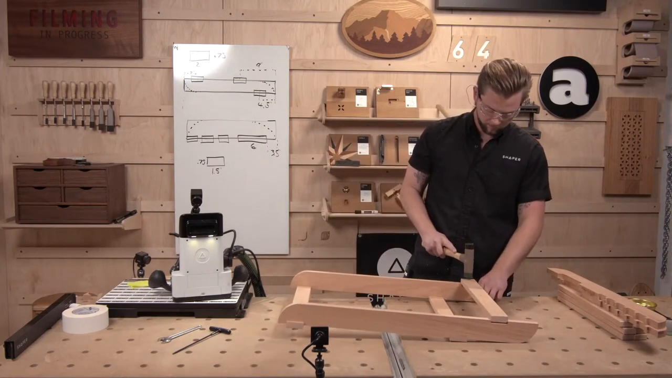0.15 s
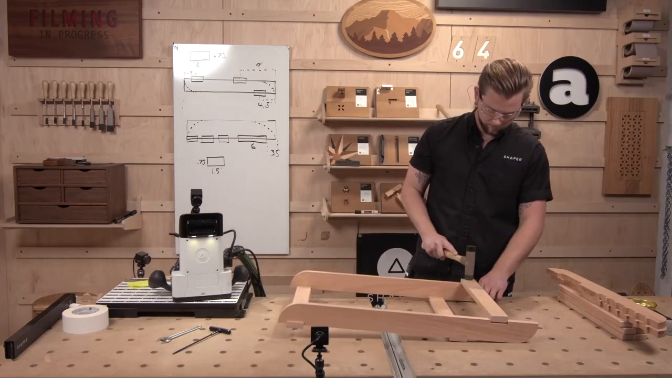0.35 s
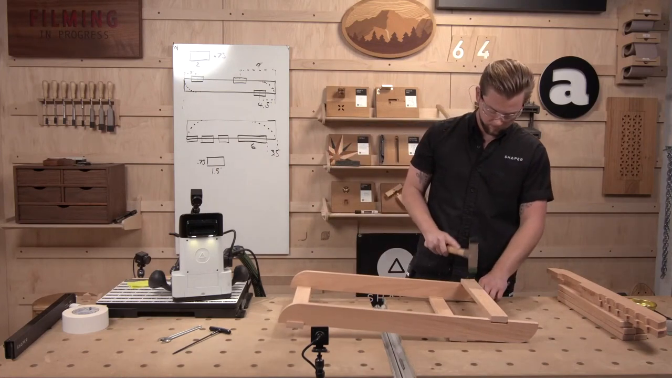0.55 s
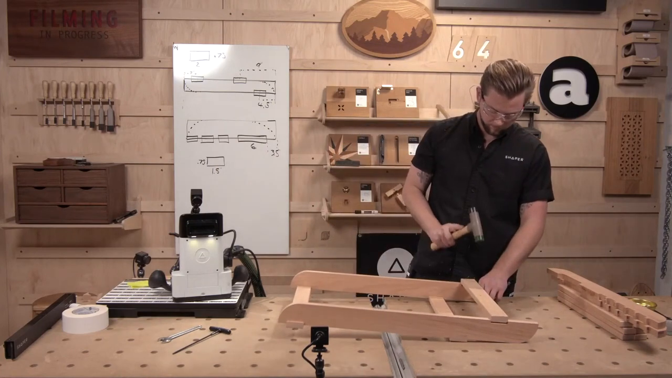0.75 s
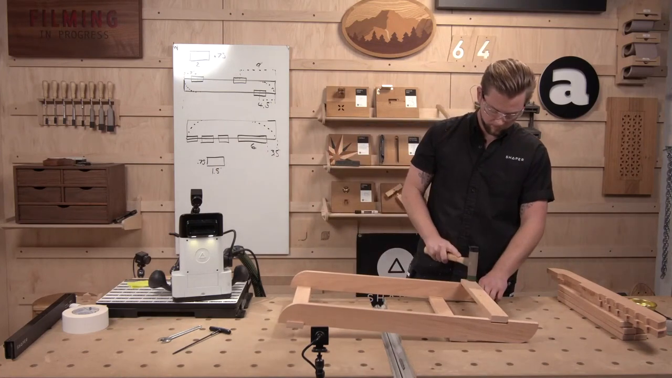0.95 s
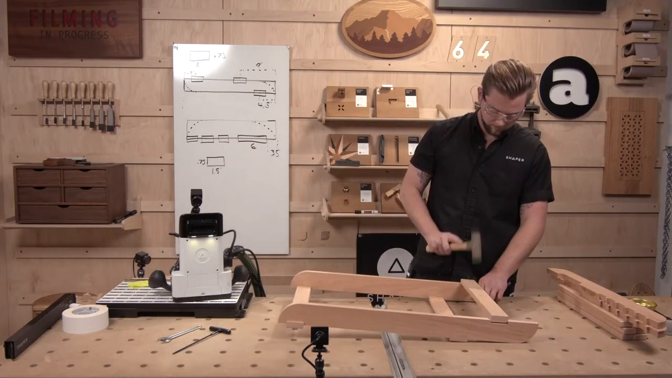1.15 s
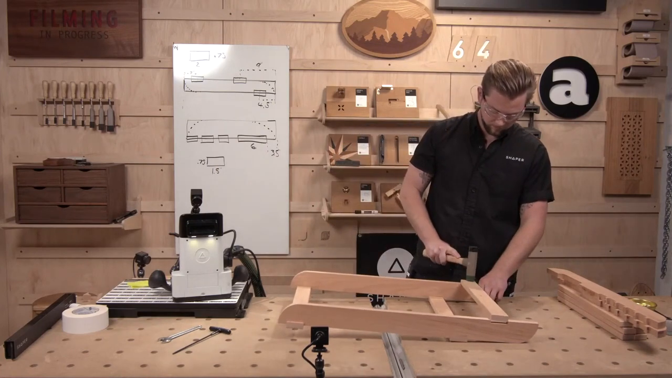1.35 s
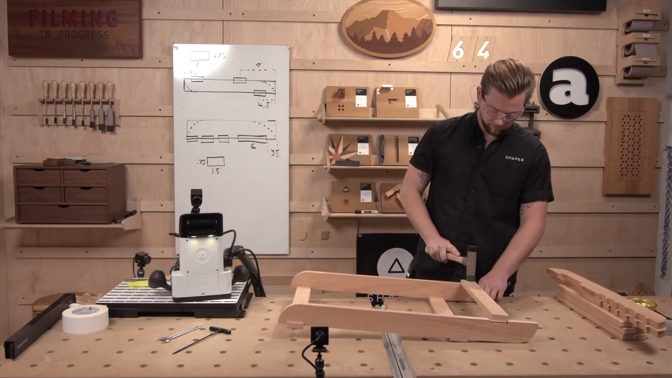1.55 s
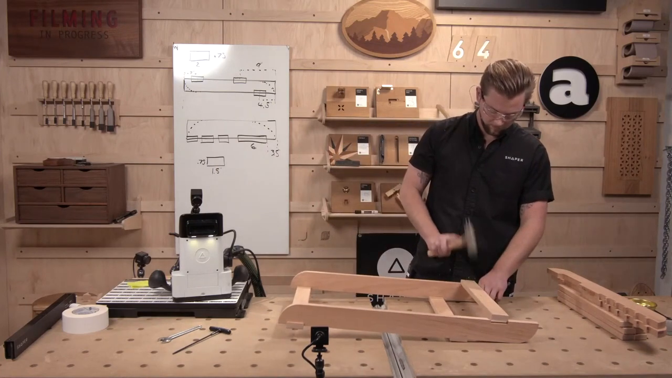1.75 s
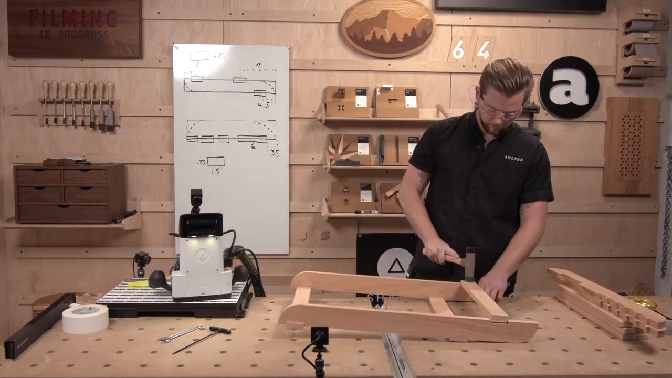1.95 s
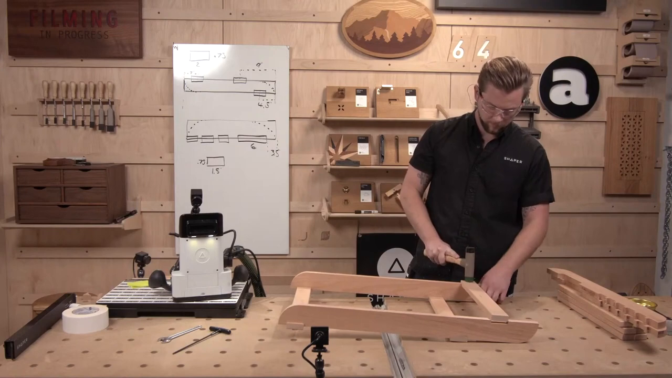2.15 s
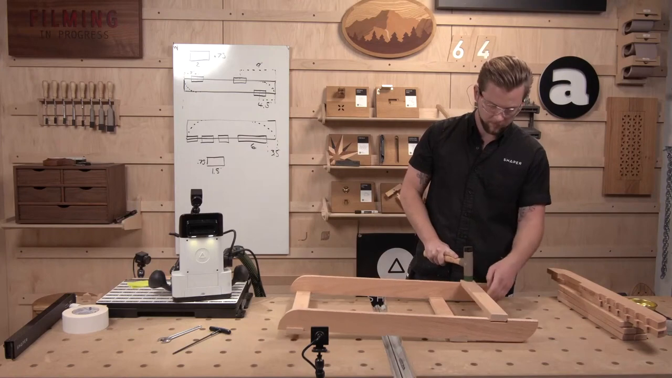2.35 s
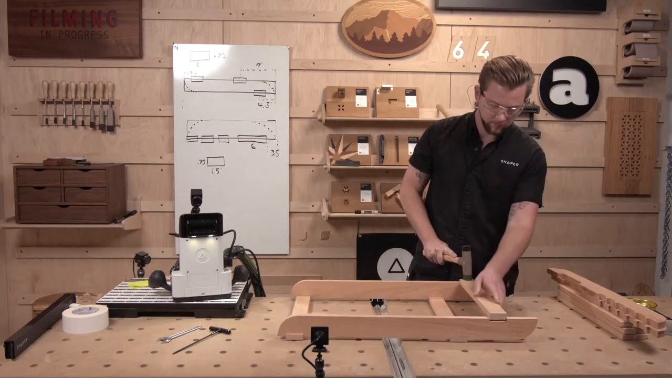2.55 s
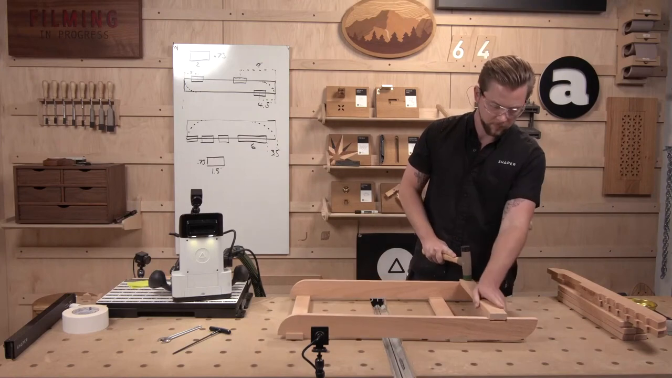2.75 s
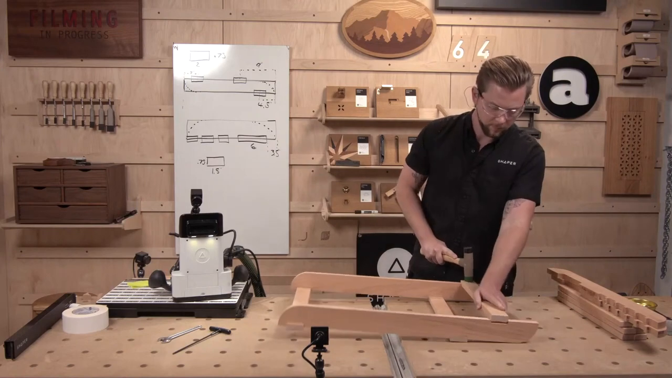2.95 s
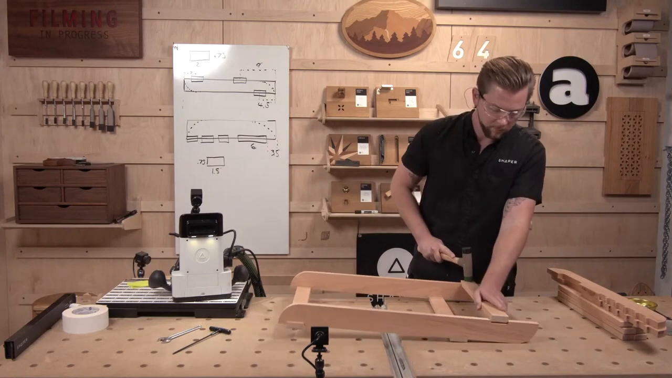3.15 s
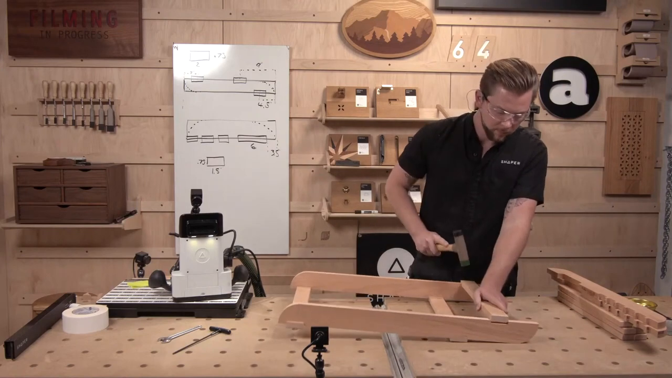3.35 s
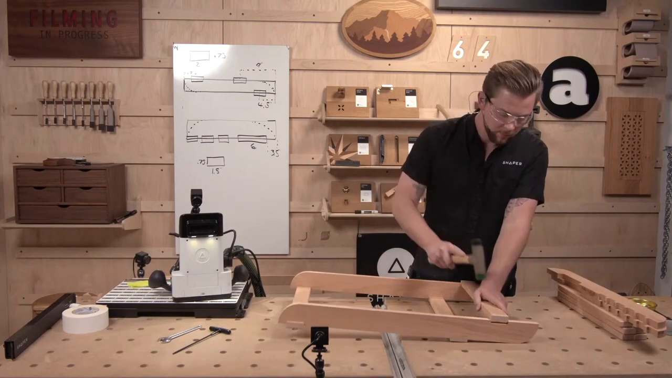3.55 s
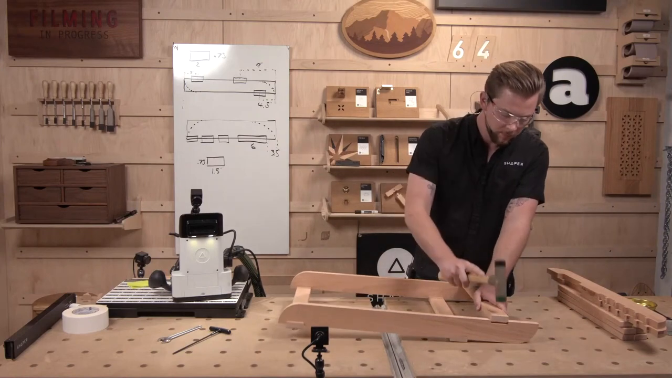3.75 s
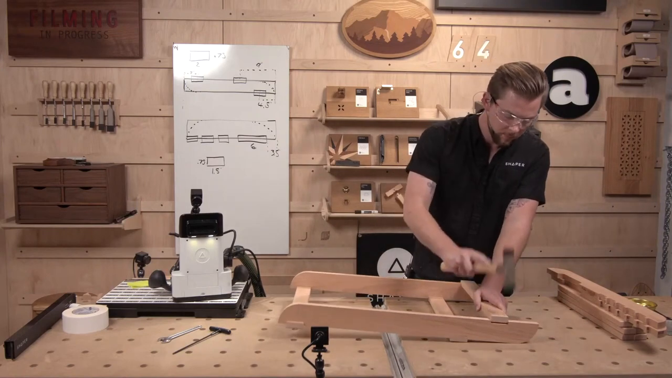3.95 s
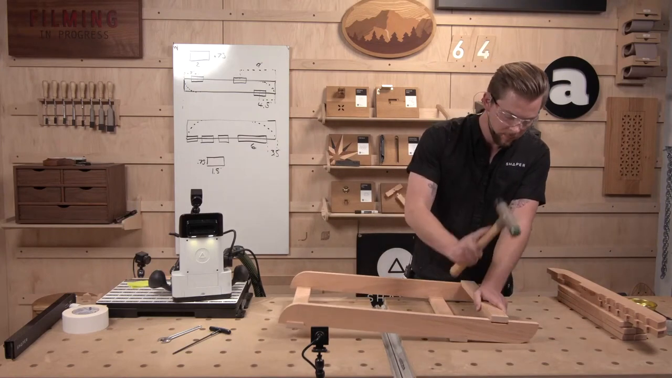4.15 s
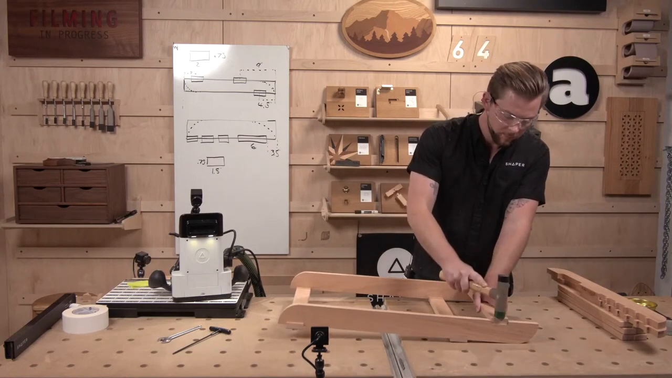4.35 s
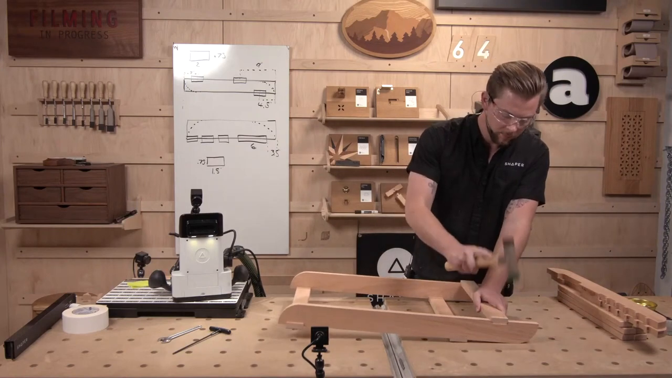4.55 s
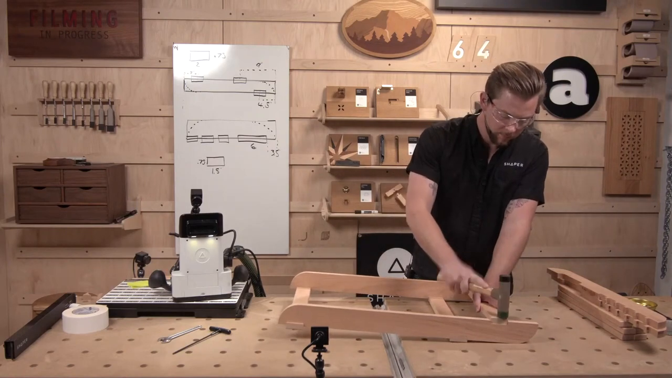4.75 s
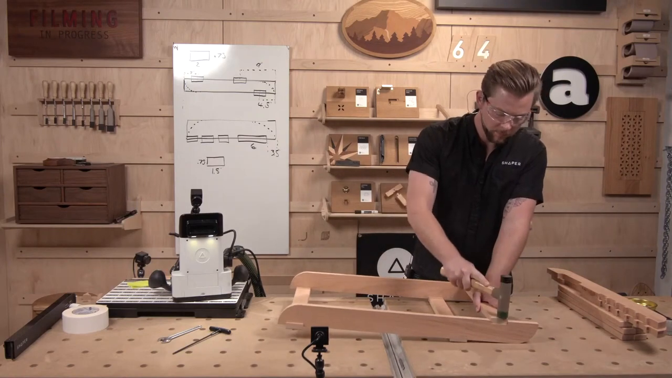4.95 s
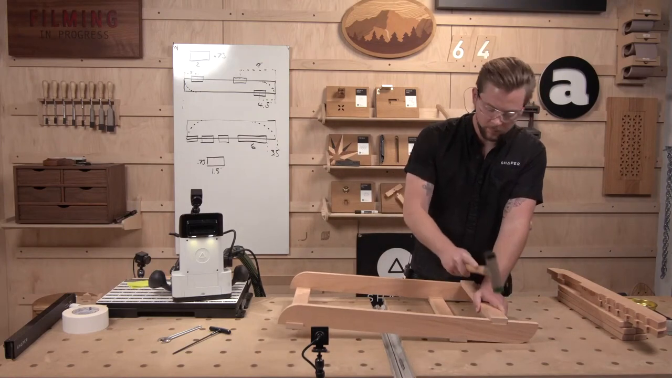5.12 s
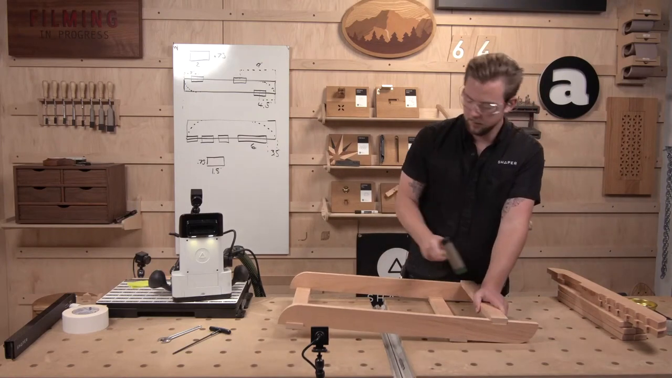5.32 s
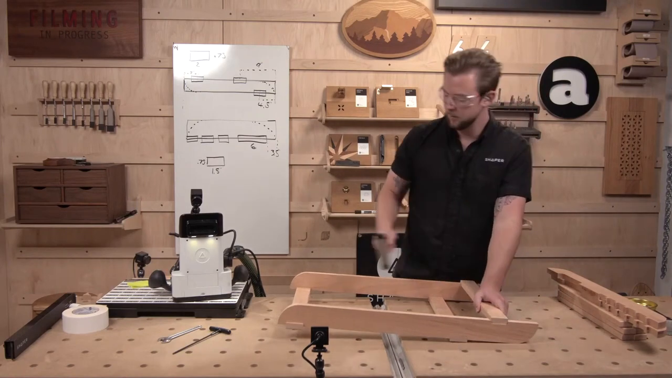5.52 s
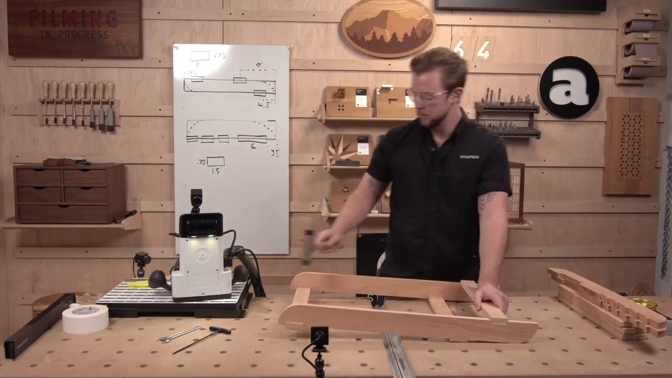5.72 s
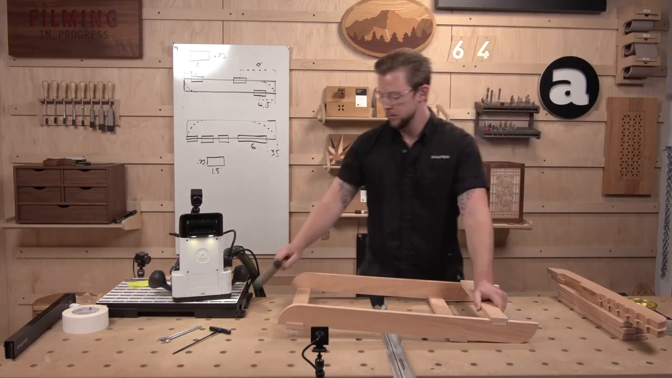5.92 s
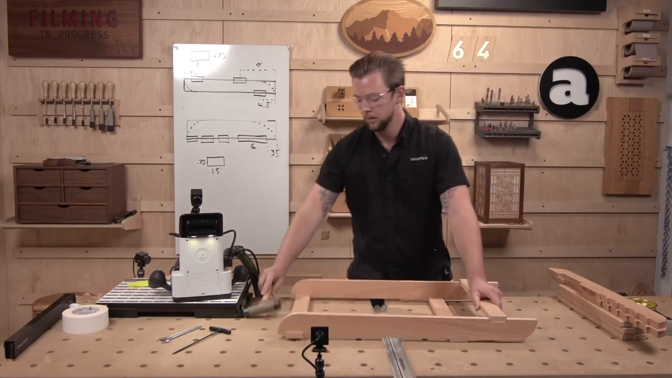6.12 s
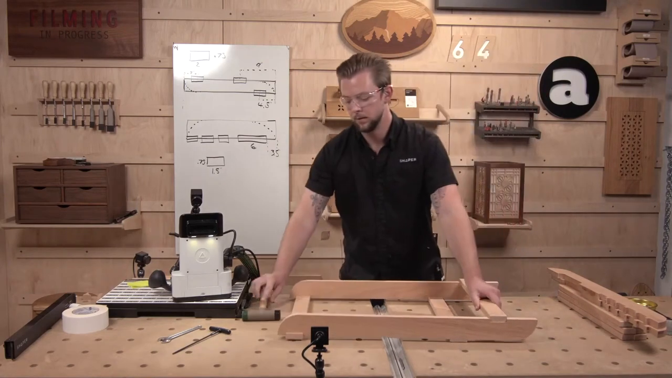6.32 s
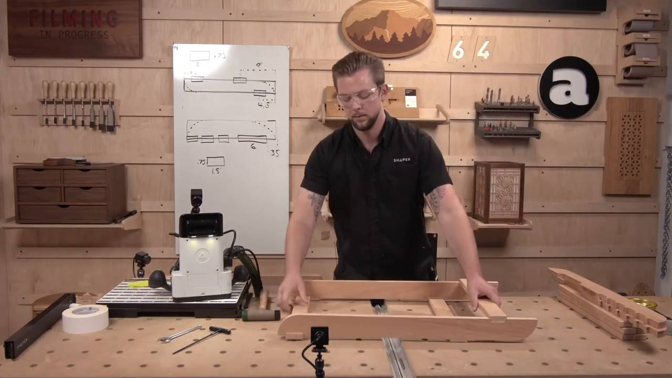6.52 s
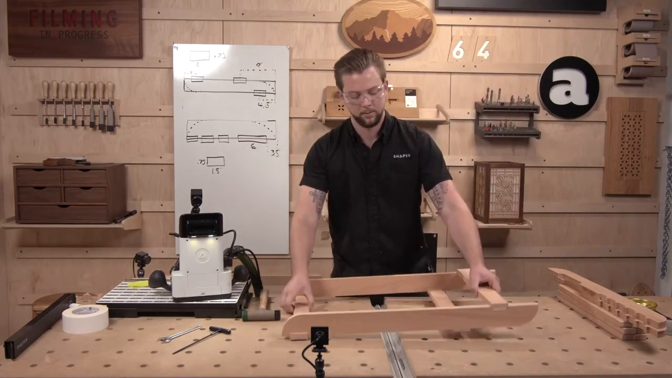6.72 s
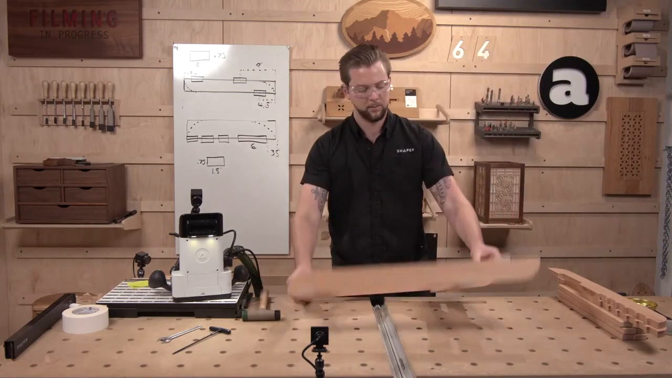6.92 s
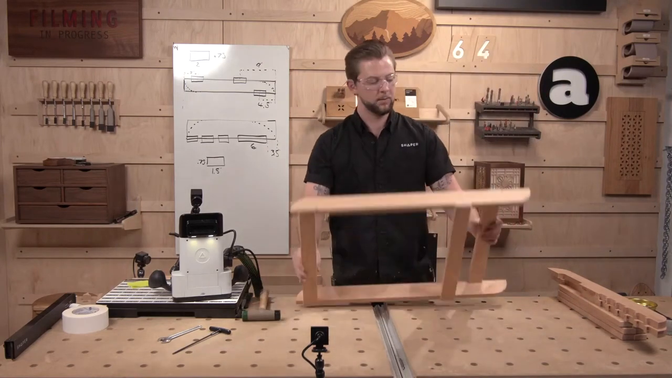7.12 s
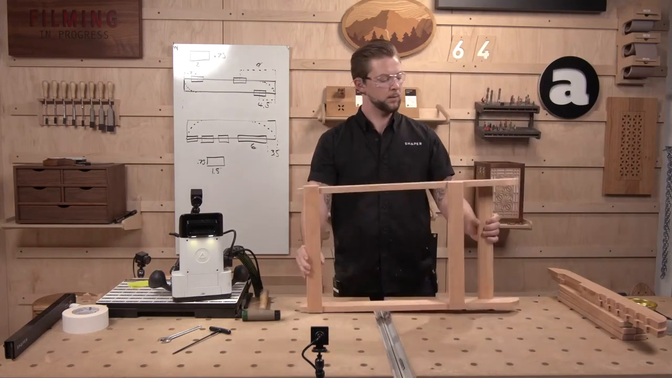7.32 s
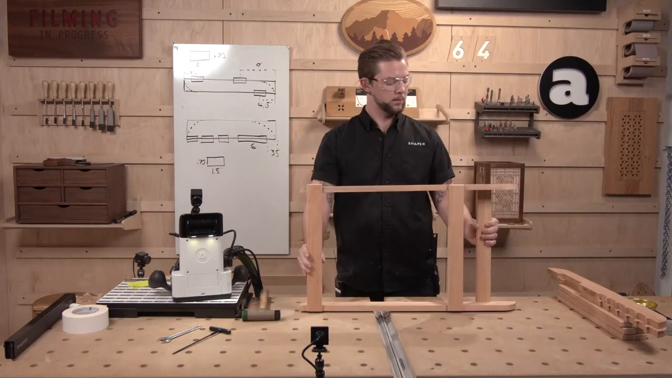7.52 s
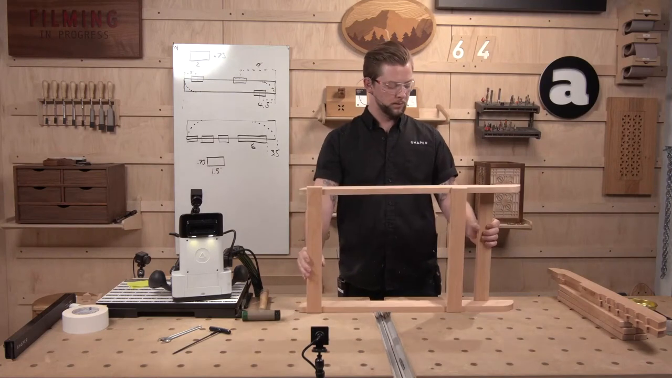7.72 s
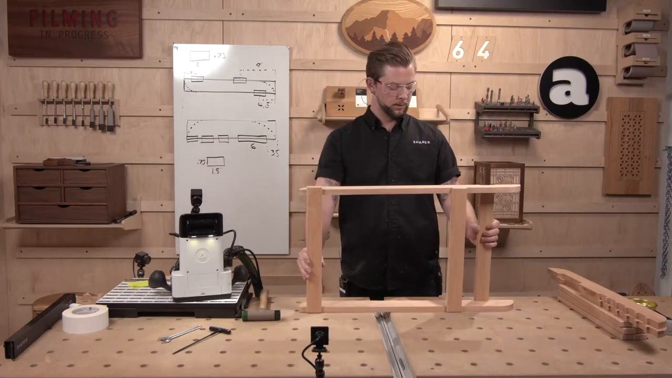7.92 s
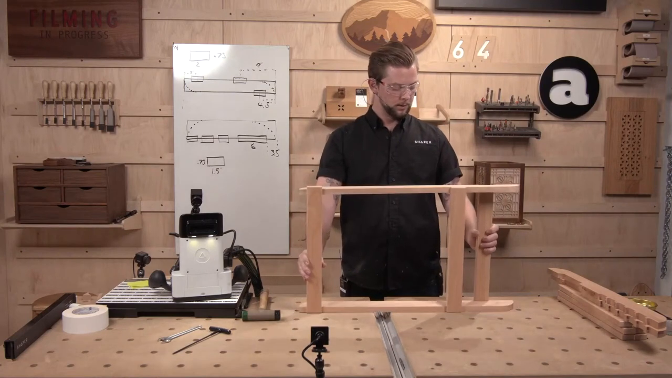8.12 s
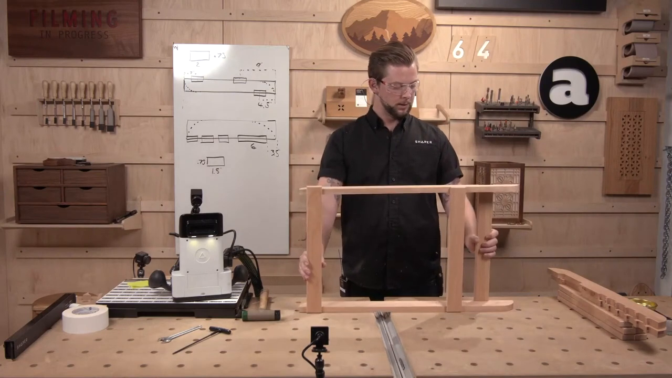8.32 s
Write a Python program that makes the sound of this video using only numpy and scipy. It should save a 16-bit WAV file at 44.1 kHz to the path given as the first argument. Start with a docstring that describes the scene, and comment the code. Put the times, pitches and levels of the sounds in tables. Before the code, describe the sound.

A mallet knocks on a wooden frame, which judders on a workbench; then the mallet clatters down, in a slightly echoing workshop.

```python
"""Over a workshop's ventilation rumble, a hardwood chair frame judders across the bench, stick and slip. A
mallet taps once, then drives a cross piece home in three blows that crack and ring the frame's modes. The frame
bumps, the joint creaks and the frame judders again, and the next joint takes three blows. Cloth rustles, the
mallet clatters down, and the frame is stood on its edge with knocks, a soft scrape and sliding palms. Each hit
leaves a bright room tail, and a limiter holds down the hardest."""
import sys
import numpy as np
from scipy import signal
from scipy.fft import rfft, irfft, next_fast_len
from scipy.io import wavfile
from scipy.ndimage import uniform_filter1d, minimum_filter1d, map_coordinates

SR = 44100
rng = np.random.default_rng(int(sys.argv[2]) if len(sys.argv) > 2 else 0)


def bounce(signal):
    """Save signal as a 16-bit WAV file at the path given by the first command-line argument."""
    frames = np.transpose(np.atleast_2d(signal))
    limited = np.clip(frames, -1, 1)
    pcm = np.round(limited * 32767).astype(np.int16)
    wavfile.write(sys.argv[1], SR, pcm)


N = 369558

# The mallet hits. Each row: start in seconds, strength in dB, place from 0 (first joint) to 1 (second),
# body in dB, hardness in dB.
MALLET_BLOWS = [(0.2818, -20, 0.045, 7.5, -7), (0.8935, 0.5, 0.18, 1, 1), (1.3622, 3, 0.16, -4.5, 1.5),
                (1.8408, 3, 0.036, -8.5, 0.5), (3.8518, 0.5, 0.68, -1.5, -7.5), (4.2977, 3, 0.85, -6, 3.5),
                (4.806, 0, 1, 3.5, 8)]
# The bench top's ring. Each row: pitch in Hz, time to fall 60 dB (t60) in seconds, level in dB.
BENCH_MODES = [(66.6, 0.13, -10), (112.4, 0.15, -10.5), (139, 0.043, -21), (243.3, 0.23, -11.5),
               (318.5, 0.068, 1.5), (447, 0.052, -9), (577, 0.11, -3.5), (688, 0.11, -10), (808, 0.08, 0.5),
               (1025, 0.11, -4.5), (1139, 0.1, -6.5), (1096, 0.03, -17), (1293, 0.079, -7),
               (1405, 0.09, -9), (1813, 0.038, -18), (1980, .09, -10), (2143, 0.058, -16),
               (2555, 0.049, -8.5), (3210, 0.03, -9), (3280, 0.017, -13.5), (4280, 0.019, -9)]
# The wash of its countless weak modes. Each row: frequency in Hz, level in dB.
BENCH_GRAIN_COLOUR = [(50, 0), (130, 5), (280, 4.5), (500, 5.5), (800, 1), (1300, -8.5), (2000, -11.5),
                      (3300, -19), (4600, -26), (7000, -28), (11000, -28.5), (16000, -42)]
# How long that wash lasts. Each row: frequency in Hz, t60 in seconds.
BENCH_GRAIN_DECAY = [(100, 0.29), (500, 0.23), (1200, 0.27), (3000, 0.21), (10000, 0.055)]


def amp(db):
    return 10 ** (np.asarray(db) / 20)


def unit(x):
    return x / np.sqrt(np.mean(x ** 2) + 1e-20)


def along(points, hz):
    """Read (Hz, value) points on a log frequency axis."""
    freqs, values = np.transpose(points)
    return np.interp(np.log(hz + 1), np.log(freqs + 1), values)


def curve(rows):
    """An automation lane: one value per sample from (seconds, value) rows."""
    return np.interp(np.arange(N) / SR, *np.transpose(rows))


def add(track, s, sound):
    """Mix a sound into the track at s seconds."""
    start = round(s * SR)
    sound = sound[max(-start, 0):]
    part = track[max(start, 0):][:len(sound)]
    part += sound[:len(part)]


def noise(colour, size):
    """Noise of rms 1, coloured by (Hz, dB) points."""
    padded = next_fast_len(size)
    gain = amp(along(colour, np.fft.rfftfreq(padded, 1 / SR)))
    return unit(irfft(rfft(rng.standard_normal(padded)) * gain, padded)[:size])


def burst(colour, size, decay_s):
    """A contact transient: noise that starts at once and dies fast."""
    return noise(colour, size) * np.exp(-np.arange(size) / SR / decay_s)


def wash(colour, decay, size):
    """Coloured noise in which each frequency dies at its own speed."""
    hz, t, spectra = signal.stft(noise(colour, size), SR, nperseg=256)
    fade = amp(-60 * t / along(decay, hz)[:, None])
    return signal.istft(spectra * fade, SR, nperseg=256)[1][:size]


def eq(x, points, size=2048):
    """Minimum-phase EQ from (Hz, dB) points: nothing sounds before the contact."""
    cepstrum = irfft(np.log(amp(along(points, np.fft.rfftfreq(size, 1 / SR)))))
    cepstrum[1:size // 2] *= 2
    cepstrum[size // 2 + 1:] = 0
    impulse = irfft(np.exp(rfft(cepstrum)))
    return signal.fftconvolve(x, impulse)[:len(x)]


def ring(modes, scatter_db, flip_every=1):
    """Damped (Hz, t60, dB) modes, their levels scattered anew for each contact."""
    t = np.arange(SR // 3) / SR
    hz, t60, db = np.transpose(modes)[:, :, None]
    polarity = (-1) ** (np.arange(len(db)) // flip_every)[:, None]
    gain = polarity * amp(db + scatter_db * rng.standard_normal(db.shape))
    return np.sum(gain * np.exp(-np.log(1000) * t / t60) * np.sin(2 * np.pi * hz * t), axis=0)


def swell(x, attack_s):
    """Round off the attack: vibration takes a moment to spread."""
    return x * (1 - np.exp(-np.arange(len(x)) / SR / attack_s))


def stroke(middle, half_length, db):
    """The envelope of a smooth hand movement that swells and fades."""
    return amp(db) * np.exp(-((np.arange(N) / SR - middle) / half_length) ** 2)


def ventilation():
    """A low rumble that ducks after each hard blow, stays down and comes back."""
    # The rumble's tone. Each row: frequency in Hz, level in dB.
    rumble_colour = [(10, -21), (22, 6), (32, -1.5), (50, -3.5), (80, -12.5), (120, -18), (170, -25.5),
                     (230, -26), (400, -38.5), (900, -68)]
    fall_s, hold_s, recover_s = 0.06, 0.14, 0.63
    corners = np.cumsum([0, fall_s, hold_s, recover_s])
    duck_db = np.zeros(N)
    for s, db, _, _, hard_db in MALLET_BLOWS:
        depth_db = 1.84 * (db + hard_db) - 1.5
        duck_db = np.maximum(duck_db, depth_db * curve(list(zip(s + corners, [0, 1, 1, 0]))))
    return amp(-53 - duck_db) * noise(rumble_colour, N)


def hiss():
    """A faint, steady noise bed."""
    # The bed's tone. Each row: frequency in Hz, level in dB.
    hiss_colour = [(150, -26), (250, -6.5), (292, -28.5), (366, -14), (392, -14), (3510, -33),
                   (11600, -37.5), (15500, -48.5)]
    return amp(-78) * noise(hiss_colour, N)


def room_tail():
    """The workshop's diffuse tail: it gathers sound from all sides of the wood, so it is smooth."""
    # The tail's tone. Each row: frequency in Hz, level in dB.
    tail_colour = [(100, -5), (400, 0.5), (1000, 1.5), (2100, 3), (3700, -7.5), (5500, -15.5), (8000, -20),
                   (12000, -25), (16000, -33)]
    # The reverb time. Each row: frequency in Hz, t60 in seconds.
    tail_decay = [(150, 0.66), (500, 0.97), (1000, .8), (2200, 0.96), (4000, 1.33), (8000, 1.1),
                  (14000, 0.65)]
    return swell(wash(tail_colour, tail_decay, 2 * SR), attack_s=0.004)


def shirt():
    """Cloth rustles once the arms start to move; sleeves swish as they reach and turn the frame."""
    # The fabric's tone. Each row: frequency in Hz, level in dB.
    cloth_colour = [(120, -35.5), (200, -11), (298, -0.5), (812, -13), (1430, -7.5), (2250, -17),
                    (3120, -17.5), (12200, -33.5), (15500, -44.5)]
    # The sleeve swishes. Each row: middle in seconds, half length in seconds, level in dB.
    swishes = [(5.92, 0.12, -82), (7.25, 0.1, -72.5), (7.912, 0.092, -74), (8.293, 0.15, -75)]
    folds_per_s, still_db, moving_db = 7, -85, -71
    folds = rng.standard_normal(N * folds_per_s // SR + 4)
    flutter_db = 2.2 * map_coordinates(folds, [np.arange(N) * folds_per_s / SR])
    movement = amp(curve([(5.15, still_db), (5.53, moving_db)]))
    movement += sum(stroke(*swish) for swish in swishes)
    return movement * amp(flutter_db) * noise(cloth_colour, N)


def palms():
    """Palms hiss faintly over the sanded wood."""
    # The hand moves. Each row: middle in seconds, half length in seconds, level in dB.
    slides = [(6.9, 0.35, -78.5), (8.186, 0.069, -72.5)]
    # The airy tone of skin on wood. Each row: frequency in Hz, level in dB.
    palm_colour = [(2000, -6), (6000, 2), (10000, -1), (13000, 5), (15500, -26)]
    return sum(stroke(*slide) for slide in slides) * noise(palm_colour, N)


def scrape():
    """The frame's edge rubs the bench as it is lifted: friction noise through the bench's modes."""
    bench = ring(BENCH_MODES, scatter_db=0)
    friction = noise([(200, -9), (600, -4), (1200, -10), (4000, -15)], N)
    rubbed = signal.fftconvolve(friction, bench)[:N]
    return stroke(middle=6.93, half_length=0.056, db=-57) * unit(rubbed)


def slip(mid_db, sharp_db):
    """One little jump of wood on wood plucks the frame's rail."""
    # The rail's ring. Each row: pitch in Hz, t60 in seconds, level in dB.
    rail_modes = [(199, 0.031, -21), (303, 0.14, -31.5), (436, 0.1, -24.5), (555, 0.01, -20),
                  (639, 0.046, -19.5), (765, 0.013, -18), (1070, 0.094, -35), (1610, 0.013, -40),
                  (2600, 0.0099, -51), (3370, .016, -36), (3840, 0.024, -58)]
    rail = ring(rail_modes, scatter_db=6.5, flip_every=2)
    grit_colour = [(150, 8), (1000, 27.5), (3500, 17), (8000, 0), (15000, -6.5)]
    grit = amp(-33.5) * burst(grit_colour, len(rail), decay_s=0.00068)
    sound = amp(-64.5) * room_tail()
    grain = amp(-30.5) * wash(BENCH_GRAIN_COLOUR, BENCH_GRAIN_DECAY, len(rail))
    add(sound, 0, rail + grit + grain)
    return eq(sound, [(200, 1.8), (600, 0), (1400, mid_db + 0.3 * sharp_db),
                      (3000, sharp_db), (10000, 3.1 * sharp_db - 6.5)])


def joint_creaks():
    """The joint creaks in a few single sharp ticks before the frame judders again."""
    # The creaks of the joint. Each row: start in seconds, gain in dB.
    creaks = [(2.988, -25), (3.0132, -31.5), (3.123, -21.5), (3.1366, -22)]
    out = np.zeros(N)
    for s, db in creaks:
        add(out, s, amp(db) * slip(mid_db=5, sharp_db=9))
    return out


def judder(slips_per_push=9):
    """The pushed frame sticks and slips on two feet in turn, ending slower, weaker and duller."""
    # The pushes. Each row: first slip in seconds, fastest moment in seconds, shortest slip period in
    # seconds, strength in dB, opening sharpness in dB, dulling in dB per second.
    pushes = [(-0.05, 0.16, 0.0543, -20.5, -1, 26), (3.151, 3.19, 0.0535, -23.5, 4, 100)]
    # The voice of each foot. Each row: gain in dB, midrange in dB, sharpness in dB.
    feet = [(-0.5, 0.5, 0), (0, 5.5, -4)]
    fade_db_per_s2, slowing_s_per_s2, foot_lag_s = 319, 0.5, 0.022
    out = np.zeros(N)
    for start, fastest, period, strength_db, first_sharp_db, dulling in pushes:
        s = start
        for _ in range(slips_per_push):
            db = strength_db - fade_db_per_s2 * max(s - fastest, 0) ** 2
            sharp_db = max(first_sharp_db - dulling * (s - start), -20)
            for foot, (foot_db, mid_db, foot_sharp_db) in enumerate(feet):
                sound = slip(mid_db, sharp_db + foot_sharp_db)
                add(out, s + foot * foot_lag_s, amp(db + foot_db) * sound)
            s += period + slowing_s_per_s2 * (s - fastest) ** 2
    return out


def bench_top(ring_scale):
    """One contact ticks and rings the bench top; a hand on the wood shortens the ring."""
    damped_modes = [(hz, ring_scale * t60, db) for hz, t60, db in BENCH_MODES]
    grain_decay = [(hz, ring_scale * t60) for hz, t60 in BENCH_GRAIN_DECAY]
    modes = ring(damped_modes, scatter_db=4, flip_every=3)
    grain = wash(BENCH_GRAIN_COLOUR, grain_decay, len(modes))
    tick_colour = [(300, 2), (1200, 5.5), (4500, -3), (9000, -20.5), (15000, -31.5)]
    tick = burst(tick_colour, len(modes), decay_s=0.00147)
    return swell(amp(-24) * modes + amp(-21) * grain + amp(-16.5) * tick, attack_s=0.00054)


def knocks(landings, far_lag_s, far_db, click_db):
    """Wood lands on the bench, near end then far end; weight brings out bass, hardness treble."""
    out = np.zeros(N)
    for s, db, weight_db, hard_db, ring_scale in landings:
        knock = amp(-50) * room_tail()
        add(knock, 0, bench_top(ring_scale))
        add(knock, far_lag_s, amp(far_db) * eq(bench_top(ring_scale), [(1000, -3), (5000, -7.5)]))
        tone = [(140, 0.99 * weight_db - 3.5), (330, weight_db), (600, 0.34 * weight_db + 1.5),
                (1050, 0), (1900, 0.5 * hard_db), (4600, hard_db), (11000, hard_db + click_db)]
        add(out, s, amp(db) * eq(knock, tone))
    return out


def frame_bumps():
    """The frame bumps down, one leg just after the other; its sharp edges add a fine click."""
    # The landings. Each row: start in seconds, strength, weight and hardness in dB, ring time factor.
    bumps = [(2.5528, -6.5, 1, 6, 0.97), (2.9575, -14.5, 0.5, -6, 0.84), (2.9993, -16.5, 2.5, 2, 0.81),
             (3.1045, -16.5, -0.5, 4, 1.16), (6.6517, -10, 2.5, -3.5, 0.56), (6.711, -17.5, 2, -5, 0.64),
             (7.3651, -16, 5.5, -2, 0.62), (7.4905, -14.5, 3.5, -8, 0.91), (7.688, -33.5, -2.5, -13, 0.95)]
    return knocks(bumps, far_lag_s=0.0037, far_db=-12.5, click_db=-1.5)


def mallet_drop():
    """The dropped mallet bounces, head just before handle; the rounded head clicks less."""
    # The clatter. Each row: start in seconds, strength, weight and hardness in dB, ring time factor.
    bounces = [(6.177, -31.5, 13.5, -10, 0.66), (6.1919, 3, -11.5, -0.5, 1.08),
               (6.2285, -0.5, 2.5, 2, 0.68), (6.2985, -1.5, -10.5, -0.5, 0.72),
               (6.3447, -7.5, -4.5, -10, 0.72), (6.3905, -3, -8, 11, 0.87), (6.4295, -14, -12.5, 4, 1.75)]
    return knocks(bounces, far_lag_s=0.0086, far_db=-5.5, click_db=-12.5)


def struck_frame(place, ring_scale):
    """The contact cracks and the frame rings; the joint that is struck sets the mix of modes."""
    # The frame's ring. Each row: pitch in Hz, t60 in seconds, level in dB when struck at the first
    # joint, level in dB at the second.
    frame_modes = [(71, .06, -30.5, -35), (145, 0.019, -21.5, -13), (227, 0.041, -28, -17),
                   (313, 0.027, -40, -14), (399, 0.08, -37.5, -19.5), (560.5, 0.056, -34, -26),
                   (728, 0.035, -16.5, -18.5), (918, 0.022, -14.5, -12), (1028.5, 0.049, -13.5, -23),
                   (1210, 0.026, -19, -16), (1470, 0.0079, -12.5, -14.5), (1850, .012, -12, -14.5),
                   (2480, 0.0043, -16, -11.5), (3140, 0.0062, -18, -9), (3740, 0.014, -10.5, -21),
                   (4240, 0.0084, -18, -25), (4820, .009, -13.5, -23), (6428, 0.0085, -15.5, -27),
                   (8500, 0.0069, -19, -26), (12640, .16, -57, -63.5), (12860, .16, -58, -63.5)]
    # The wash of its countless weak modes. Each row: frequency in Hz, level in dB.
    grain_colour = [(60, -16.5), (200, -2), (420, 1.5), (600, -0.5), (950, -5.5), (1500, -2.5),
                    (2500, -5.5), (3800, -4.5), (5500, -16.5), (9000, -21.5), (12000, -22.5), (16000, -39)]
    # How long that wash lasts. Each row: frequency in Hz, t60 in seconds.
    grain_decay = [(150, .15), (500, 0.17), (1000, 0.17), (3000, .09), (10000, 0.064)]
    excited = [(hz, ring_scale * t60, first_db + place * (second_db - first_db))
               for hz, t60, first_db, second_db in frame_modes]
    modes = ring(excited, scatter_db=1.5)
    grain = amp(-21.5) * swell(wash(grain_colour, grain_decay, len(modes)), attack_s=0.0015)
    crack_colour = [(500, -15), (2000, 1), (4500, 0), (9000, -12), (15000, -26)]
    crack = amp(-15) * burst(crack_colour, len(modes), decay_s=0.0018)
    return swell(modes + crack, attack_s=0.00055) + grain


def mallet_blows():
    """Each blow rings frame and room and leaves the bench humming; a tight joint sounds harder."""
    # Treble that the stiffer first joint sends round the room. Each row: frequency in Hz, gain in dB.
    sheen = [(2500, -2), (3400, 0.5), (3900, 2), (4500, -0.5), (5200, 4), (5700, 0), (6300, 4), (7000, 6),
             (7700, 0), (9000, 2), (12000, -3)]
    t = np.arange(2 * SR) / SR
    bench_hum = amp(-60.5) * np.sin(2 * np.pi * 177 * t) * np.exp(-t / 0.16)
    out = np.zeros(N)
    for s, db, place, body_db, hard_db in MALLET_BLOWS:
        wood = struck_frame(place, ring_scale=1.2 if db < 0 else 1)  # the light tap rings longer
        tail = eq(room_tail(), [(hz, (1 - place) * lift_db) for hz, lift_db in sheen])
        blow = amp(0.29 * hard_db - 44) * tail
        add(blow, 0, wood)
        thud_db = 3.5 * place - 1
        top_db = 0.46 * hard_db + 0.55 * min(db, 0)  # the tap's softer contact loses top end
        tone = [(180, thud_db), (450, body_db), (900, 0), (3500, hard_db), (9000, top_db)]
        add(out, s, amp(db) * (eq(blow, tone) + bench_hum))
    return out


def scene():
    """Everything at the bench, mixed in mono."""
    wood = frame_bumps() + mallet_drop() + mallet_blows() + judder() + joint_creaks() + scrape()
    return (wood + palms() + ventilation() + shirt() + hiss())[None]


def limiter(x, ceiling_db, window=64):
    """A fast look-ahead limiter that pulls the gain down around each peak."""
    needed_gain = np.minimum(1, amp(ceiling_db) / (np.abs(x) + 1e-9))
    return x * uniform_filter1d(minimum_filter1d(needed_gain, window), window)


def record(dry):
    """The master chain: limiter, then a brick-wall low-pass."""
    cutoff_hz = 15900
    held = limiter(dry, ceiling_db=-4.2)
    padded = next_fast_len(N + SR // 2)
    passband = np.fft.rfftfreq(padded, 1 / SR) < cutoff_hz
    return irfft(rfft(held, padded) * passband, padded)[..., :N]


dry = scene()
out = record(dry)
bounce(out)
```